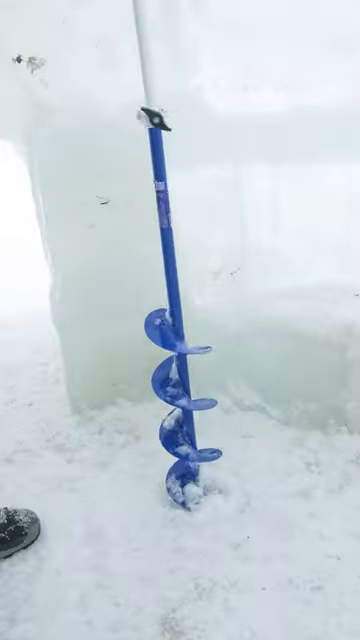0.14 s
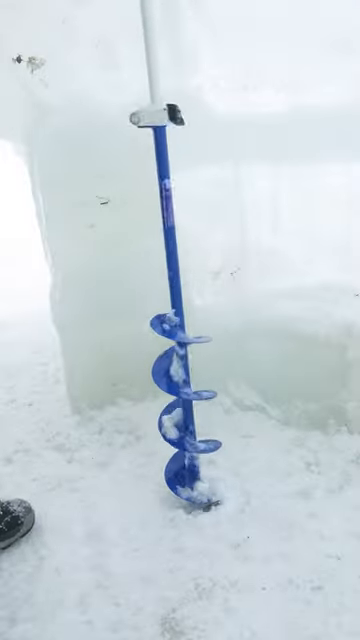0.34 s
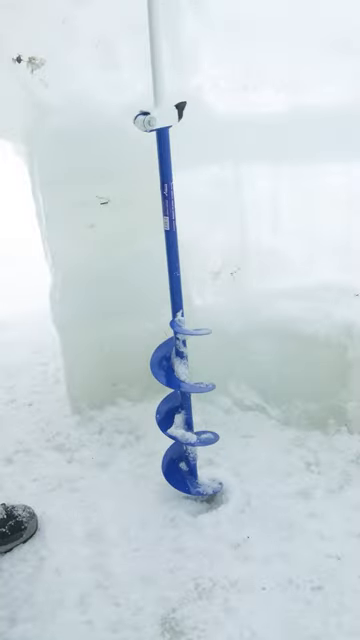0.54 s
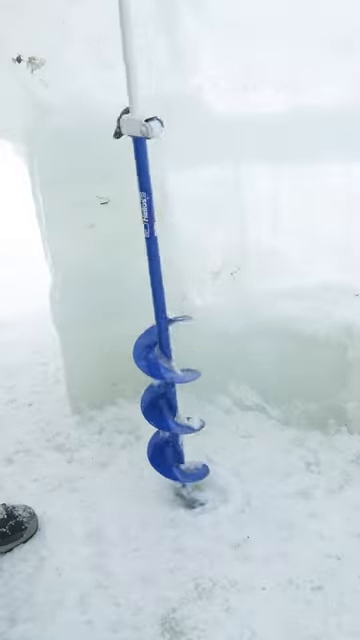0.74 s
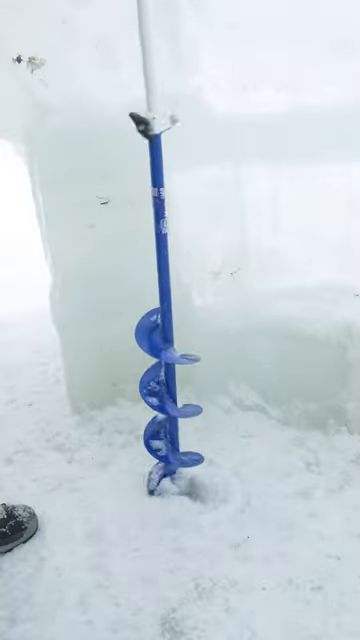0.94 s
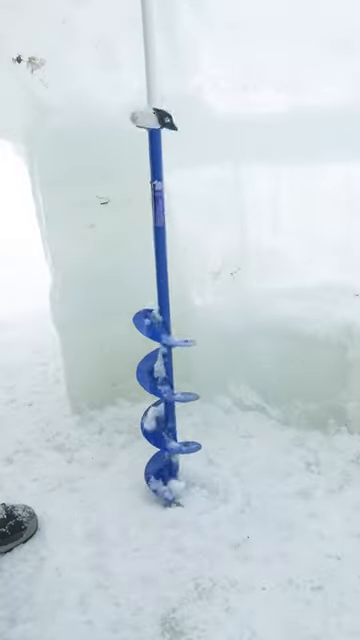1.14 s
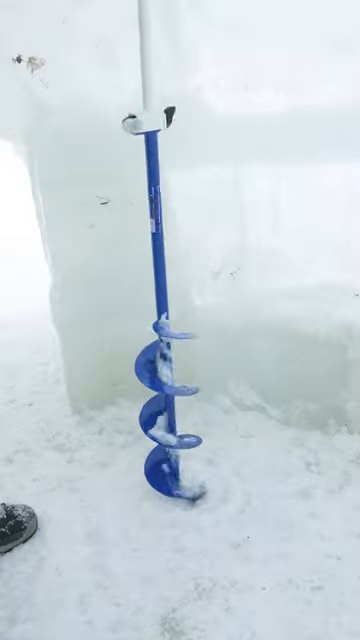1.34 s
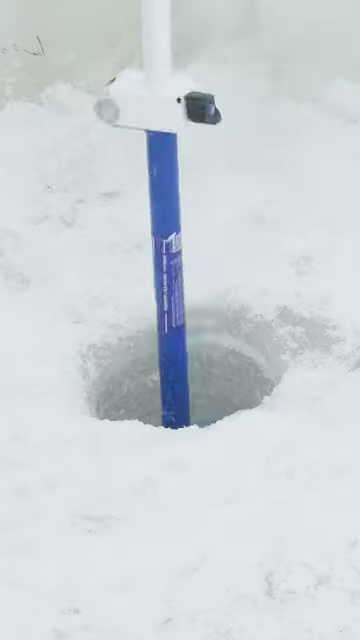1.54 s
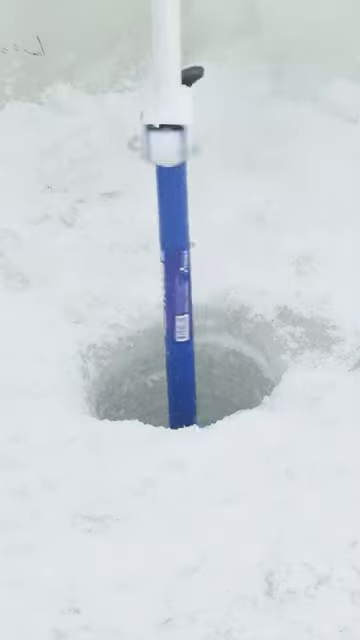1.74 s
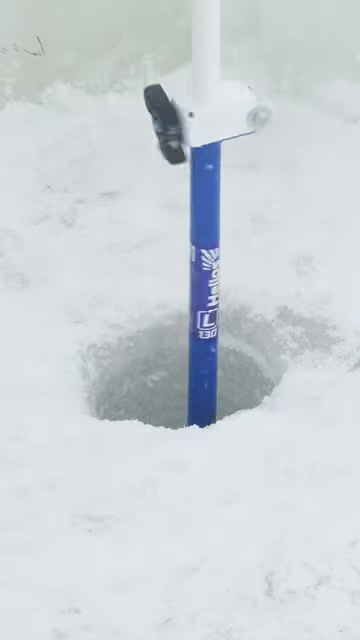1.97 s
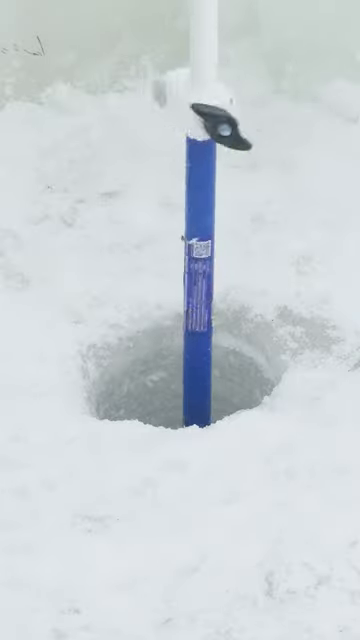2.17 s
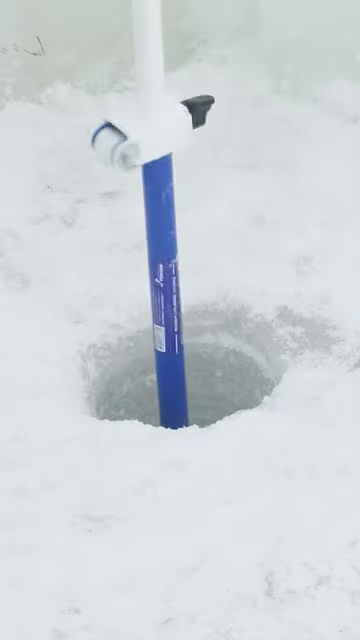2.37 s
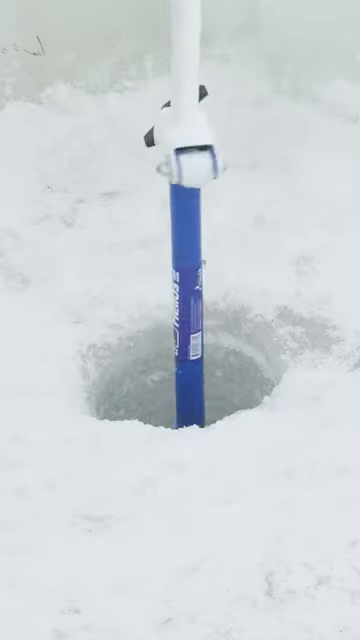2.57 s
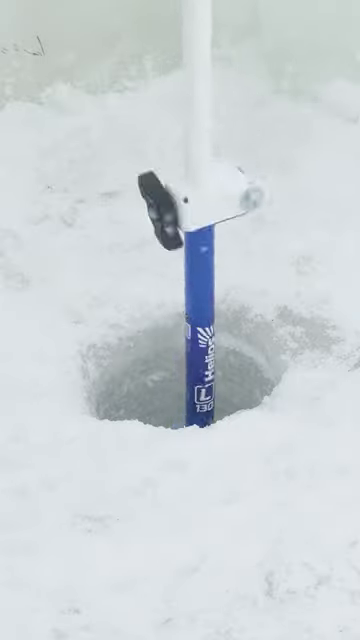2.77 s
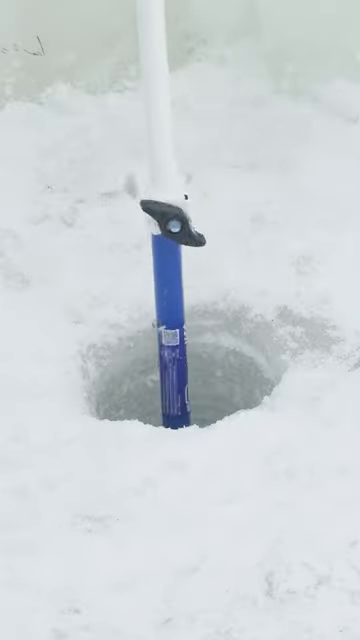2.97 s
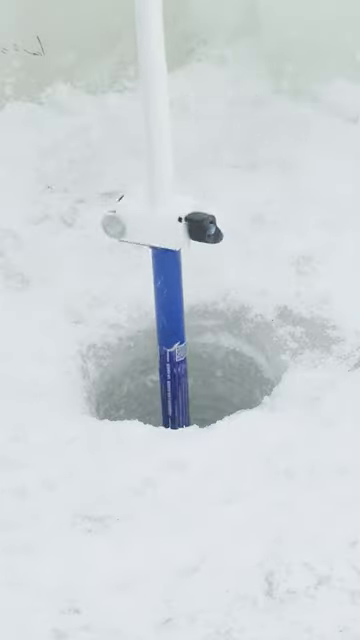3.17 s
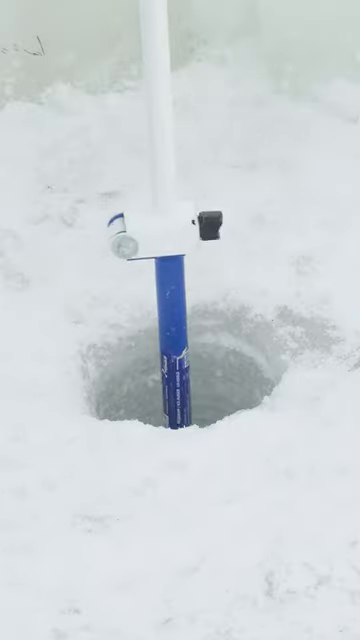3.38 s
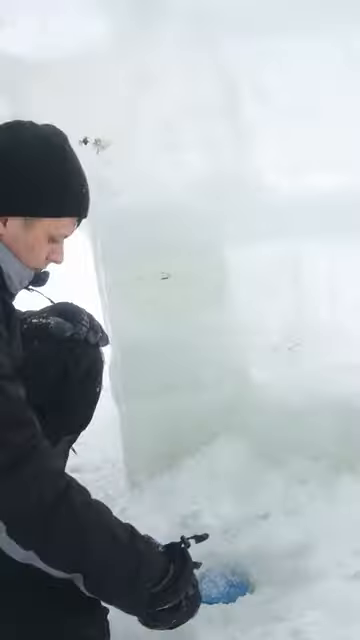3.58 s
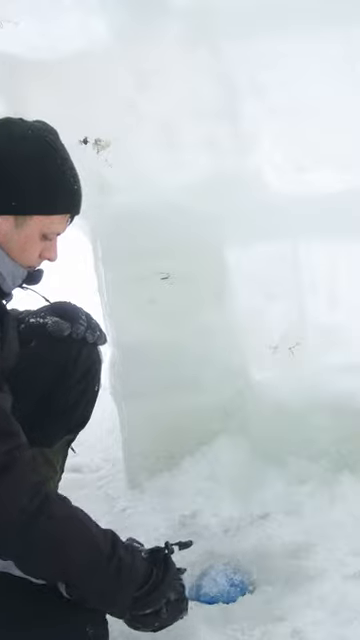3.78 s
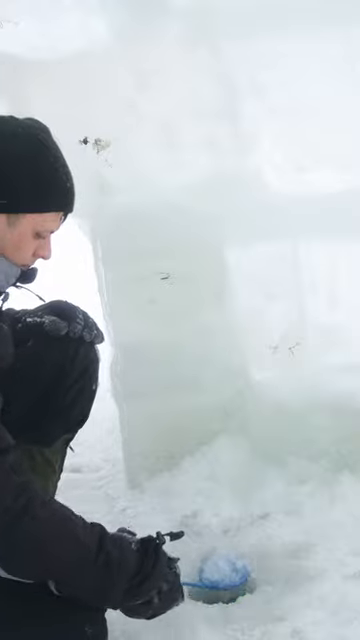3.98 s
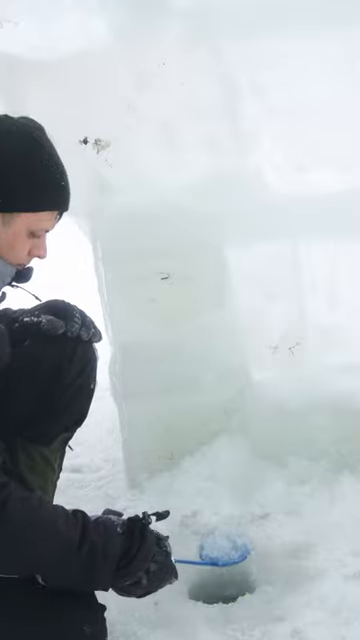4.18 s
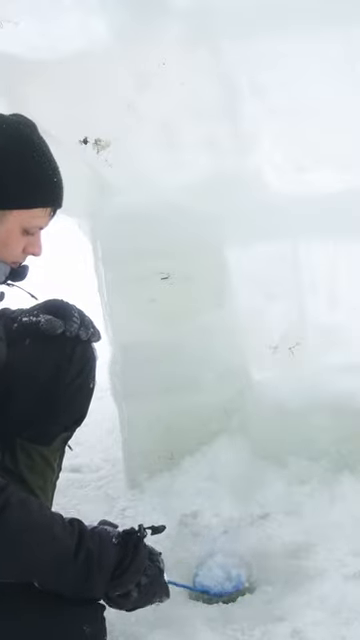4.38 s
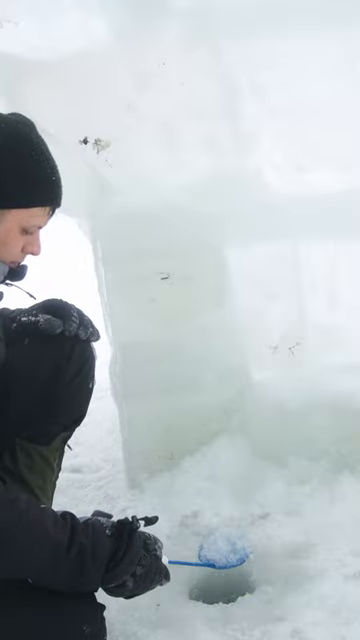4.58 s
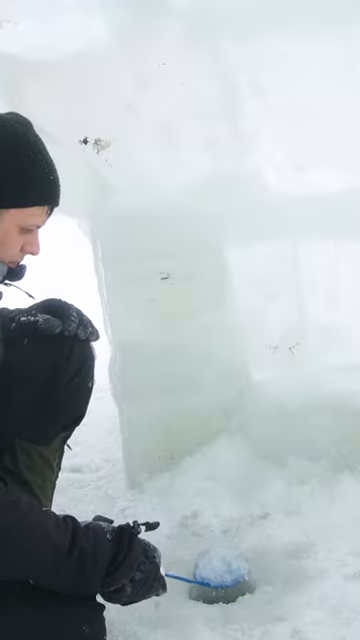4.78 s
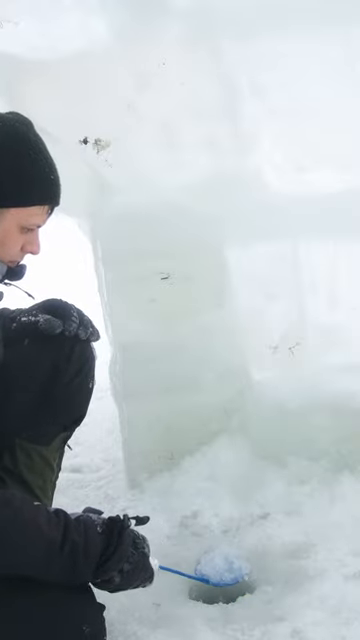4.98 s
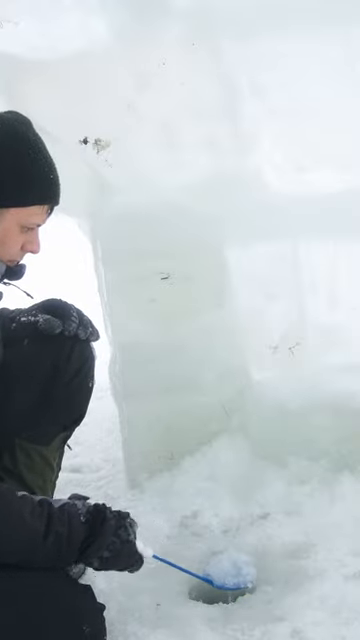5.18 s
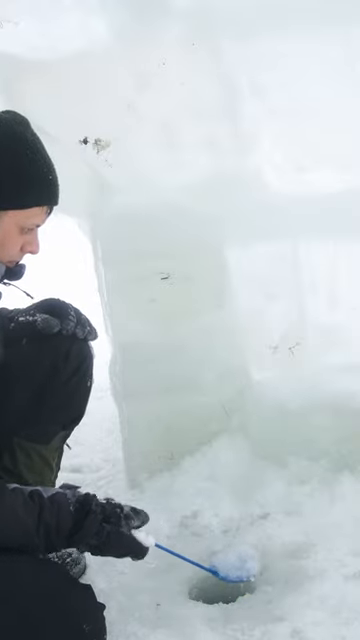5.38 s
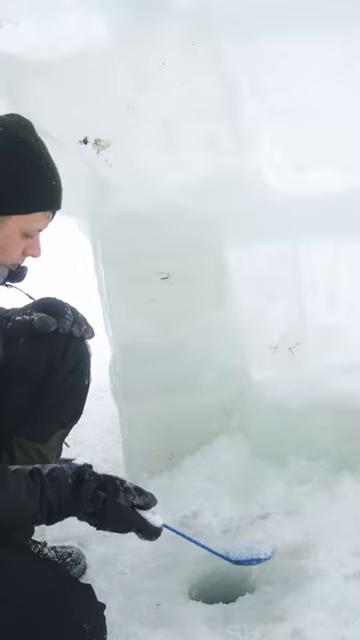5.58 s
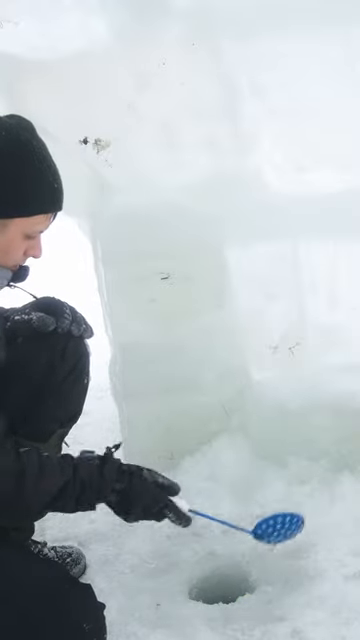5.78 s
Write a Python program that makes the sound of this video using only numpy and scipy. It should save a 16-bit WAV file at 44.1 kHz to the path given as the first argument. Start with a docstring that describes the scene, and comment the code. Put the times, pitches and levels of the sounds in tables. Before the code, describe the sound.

A hand auger grinds through ice with sharp cracks, breaks through into slush, then water drips from a ladle as a sleeve rustles.

```python
"""Inside an ice shelter on a lake, a hand auger shaves the ice: first at the surface, where its bare
steel flight rings, then close up and deep in the hole, where the ice sheet booms. The blades break
through and slush slides over rising water. Later a ladle lifts the slush: drops fall in the hole,
a sleeve rustles, water drains and grains scrape off the ladle."""
import sys
import numpy as np
from scipy import signal
from scipy.io import wavfile
from scipy.ndimage import uniform_filter1d

SR = 44100
rng = np.random.default_rng(int(sys.argv[2]) if len(sys.argv) > 2 else 0)


def master(y):
    """Save y as 16-bit WAV."""
    cut = np.clip(np.atleast_2d(y).T, -1, 1)
    pcm = np.round(cut * 32767)  # scale
    wavfile.write(sys.argv[1], SR, pcm.astype(np.int16))


N = 256662
T = np.arange(N) / SR
GIVE_S = 0.013  # the load on the blades is gone this soon after the ice gives
# The dull wash under water and sleeve. Each row: frequency in Hz, relative level in dB.
WASH_COLOUR = [(50, -25), (141, 0.5), (243, -0.5), (1500, -12), (1950, -54)]


def gain_of(db):
    """Decibels to amplitude."""
    return 10 ** (np.asarray(db) / 20)


def unit_rms(x):
    """Scales a signal to rms 1."""
    return x / np.sqrt(np.mean(x ** 2) + 1e-20)


def add(mix, start_s, sound):
    """Lays a sound into the mix."""
    part = mix[round(start_s * SR):][:len(sound)]
    part += sound[:len(part)]


def stretch(start_s, end_s):
    """The times of a stretch and its 3 ms edge fades."""
    t = T[round(start_s * SR):round(end_s * SR)]
    return t, np.clip(np.minimum(t - t[0], t[-1] - t) / .003, 0, 1)


def follow(t, rows):
    """The columns of a breakpoint curve at the times t."""
    times, *columns = np.transpose(rows)
    return [np.interp(t, times, column) for column in columns]


def drift(count, span_s):
    """A smooth random wander of rms 1 that changes over span_s."""
    size = int(span_s * SR)
    return unit_rms(uniform_filter1d(uniform_filter1d(rng.standard_normal(count), size), size))


def coloured(x, colour, lo_hz=0):
    """Minimum-phase EQ; for white input the band above lo_hz gets rms 1."""
    hz = abs(np.fft.fftfreq(4096, 1 / SR))
    points_hz, points_db = np.transpose(colour)
    db = np.interp(np.log(hz + 1), np.log(points_hz), points_db)
    log_gain = np.log(gain_of(np.maximum(db, -100)))
    taps = np.fft.ifft(np.exp(np.conj(signal.hilbert(log_gain)))).real[:2048]
    share = np.sum(np.exp(2 * log_gain[hz >= lo_hz])) / np.sum(np.exp(2 * log_gain))
    return unit_rms(signal.oaconvolve(x, taps)[:len(x)]) / np.sqrt(share)


def patchy(x, depth_db, tilt_db=0):
    """The contact keeps shifting: patches of the spectrum swell and sink; tilt is in dB per octave."""
    hz, t, spectrum = signal.stft(x, SR, nperseg=256)
    patches = rng.standard_normal(spectrum.shape[::-1]).T
    patches = unit_rms(uniform_filter1d(uniform_filter1d(patches, size=3, axis=0), size=30, axis=1))
    patches *= np.clip(hz[:, None] / 1500, .2, 1)  # the bass comes from the whole sheet and is steadier
    slope = np.interp(t * SR, np.arange(len(x)), tilt_db * np.ones(len(x)))
    octaves = np.log2(np.maximum(hz[:, None], 900) / 6000)
    spectrum *= gain_of(depth_db * patches + octaves * slope)
    return signal.istft(spectrum, SR, nperseg=256)[1][:len(x)]


def resonate(x, hz, width_hz):
    """A resonance that can glide: shifts hz down to zero, smooths, shifts back."""
    carrier = np.exp(2j * np.pi * np.cumsum(hz * np.ones(len(x))) / SR)
    pole = np.exp(-np.pi * width_hz / SR)
    return 2 * (carrier * signal.lfilter([1 - pole], [1, -pole], x / carrier)).real


def ring(x, modes, waver_db, bend=0.017):
    """Drives modes that waver in level and bend in pitch as the contact shifts; the sum has rms 1."""
    out = 0
    for hz, width_hz, db in modes:
        bent_hz = hz * (1 + bend * drift(len(x), 0.021))
        mode = resonate(resonate(x, bent_hz, 1.87 * width_hz), bent_hz, 0.94 * width_hz)
        out = out + gain_of(db + waver_db * drift(len(x), 0.056)) * mode
    return unit_rms(out)


def grit(count, per_s, spread_db, hiss, judder_db):
    """Small uneven clicks over fine hiss, as of chipping ice; the contact judders, so they clump."""
    clicks = gain_of(spread_db * np.minimum(rng.exponential(1, count), 4.5))
    clicks *= rng.choice([-1., 1.], count)
    clicks *= rng.random(count) < per_s / SR
    grains = unit_rms(clicks) + hiss * rng.standard_normal(count)
    return unit_rms(grains * gain_of(judder_db * drift(count, 0.0049)))


def air():
    """A faint, steady bed of room tone."""
    # Each row: frequency in Hz, relative level in dB.
    colour = [(40, -18), (401, -11), (1060, -24), (4590, -16), (8830, -27), (15700, -34.5)]
    return gain_of(-63) * coloured(rng.standard_normal(N), colour)


def shelter(x, t60_s):
    """Hard ice walls return sparse reflections of random sign, dying away."""
    taps = np.zeros(SR // 4)
    slots = np.arange(200, len(taps) - 20, 20)
    taps[slots + rng.integers(0, 20, len(slots))] = rng.choice([-1., 1.], len(slots))
    taps *= gain_of(-60 * T[:len(taps)] / t60_s)
    return signal.oaconvolve(x, taps / np.linalg.norm(taps))[:N]


def gurgle():
    """Water draining through the ladle hums in the mouth of the hole."""
    # Each row: time in seconds, level in dB.
    swell = [(5.13, -60), (5.23, -48), (5.37, -55)]
    t, edge = stretch(swell[0][0], swell[-1][0])
    hum_hz, width_hz = 837, 70
    hum = ring(rng.standard_normal(len(t)), [(hum_hz, width_hz, 0)], waver_db=1.0)
    return t[0], edge * gain_of(follow(t, swell)[0]) * hum


def ladle_scrape():
    """Slush grains slide off the ladle and strike its modes."""
    # Each row: pitch in Hz, nominal width in Hz, relative level in dB.
    ladle_modes = [(2780, 410, 1), (4870, 200, -1)]
    # Each row: time in seconds, level in dB.
    swell = [(5.201, -71), (5.52, -41.5), (5.6, -45)]
    t, edge = stretch(swell[0][0], swell[-1][0])
    grains = grit(len(t), per_s=2000, spread_db=0, hiss=0.54, judder_db=1.5)
    ladle = ring(grains, ladle_modes, waver_db=3.5, bend=0.041)
    return t[0], edge * gain_of(follow(t, swell)[0]) * ladle


def rustle():
    """A sleeve settles, then sweeps as the arm lifts; wet snow rubs. The loudest sets the brightness."""
    # The cloth's tone. Each row: frequency in Hz, relative level in dB.
    colour = [(40, -43), (75, -31), (276, -9), (492, -8.5), (1350, -7.5), (4610, -3), (10200, -11),
              (15700, -36)]
    # The arm's move. Each row: time in seconds, level in dB, brightness in dB per octave.
    sweep = [(3.58, -59, -1), (4.05, -64.5, -3), (4.13, -69.5, -1.5), (4.9, -61, -2), (5.03, -50.5, -0.5),
             (5.33, -42.5, 0.5), (5.82, -43, -1.5)]
    # Wet snow. Each row: start and fade time in seconds, level in dB, brightness in dB per octave.
    rubs = [(3.588, 0.16, -61.5, -7), (3.693, 0.11, -55.5, -1.5), (4.377, 0.21, -57.5, -2.5),
            (4.515, 0.083, -58, -1), (4.58, 0.045, -55, -1.5), (4.734, 0.057, -50.5, -2.5),
            (4.776, 0.11, -53, -0.5), (4.955, 0.019, -42.5, 4.5)]
    rise_s, fall_db = 0.0052, -14.5  # a rub falls this far over its fade time
    t, edge = stretch(3.58, 5.82)
    sleeve_db, tilt_db = follow(t, sweep)
    power = gain_of(sleeve_db) ** 2
    weighted_tilt = power * tilt_db
    for start_s, fade_s, db, rub_tilt_db in rubs:
        age = np.maximum(t - start_s, 0)
        rub = np.minimum(age / rise_s, 1) * gain_of(db + fall_db * (age / fade_s) ** 2)
        power += rub ** 2
        weighted_tilt += rub ** 2 * rub_tilt_db
    body = gain_of(1.814 * sleeve_db + 15) * coloured(rng.standard_normal(len(t)), WASH_COLOUR)
    friction = grit(len(t), per_s=5000, spread_db=2.7, hiss=1.4, judder_db=0.6)
    swish = patchy(coloured(friction, colour, lo_hz=4720), depth_db=2.3, tilt_db=weighted_tilt / power)
    return t[0], edge * (np.sqrt(power) * swish + body)


def snap(hz):
    """A dry crack of under two cycles, with a weaker after-swing."""
    t = np.arange(200) / SR - .0009
    crack = np.exp(-(t * hz / .6) ** 2)
    after_swing = .25 * np.clip(t * hz, 0, 1) * np.exp(-t / .0012)
    return (crack + after_swing) * np.cos(2 * np.pi * hz * t)


def drop(hz):
    """A short splash and a rising bubble note that wobbles among the slush; small bubbles die sooner."""
    t = np.arange(4000) / SR
    t60_s = 0.036 * (1000 / hz) ** 0.6
    phase = 2 * np.pi * hz * (t + 2.9 * t ** 2) + .8 * drift(len(t), .003)
    bubble = np.minimum(t * hz, 1) * gain_of(-60 * t / t60_s) * np.sin(phase)
    bubble *= 1 + 0.3 * drift(len(t), 0.0016)
    splash = gain_of(-4 - 60 * t / 0.0037) * rng.standard_normal(len(t))
    return bubble + signal.lfilter(*signal.butter(2, [1500, 9000], "band", fs=SR), splash)


def drips():
    """Wet slush ticks and drops fall from the ladle into the hole."""
    # Each row of both: start in seconds, level in dB, pitch of the tick or bubble in Hz.
    ticks = [(3.612, -35, 5500), (3.648, -34, 4500), (3.677, -36, 7000), (3.852, -33, 3500),
             (4.092, -43, 4500), (4.378, -32.5, 9500), (4.524, -33, 3200), (4.591, -32, 8000),
             (4.738, -32, 8000), (4.829, -32, 6000), (4.959, -26, 8900), (4.612, -24, 3700),
             (4.991, -25, 5800)]
    drops = [(3.724, -40.5, 1620), (3.734, -35, 3820), (3.853, -40.5, 1274), (4.284, -43, 2430),
             (4.3, -36.5, 1030), (4.341, -34.5, 930), (4.506, -46, 2110), (4.533, -35.5, 1270),
             (4.581, -37, 3230), (4.612, -27.5, 3670), (4.626, -28.5, 2740), (4.651, -35, 3100),
             (4.737, -28.5, 966), (4.778, -37.5, 1900), (4.940, -35, 5000), (4.959, -30.5, 4670),
             (5.009, -32, 3690), (5.052, -32, 2200), (5.590, -30, 1375), (5.706, -26.5, 4320)]
    track = np.zeros(N)
    for voice, hits in ((snap, ticks), (drop, drops)):
        for start_s, db, hz in hits:
            add(track, start_s, gain_of(db) * voice(hz))
    return track


def slush():
    """Shavings slide and crackle over a low wash of rising water."""
    # The crackle's tone. Each row: frequency in Hz, relative level in dB.
    colour = [(240, -27), (400, -1.5), (798, -4), (1800, 0.5), (2650, 0), (4130, 1), (8640, -13),
              (15700, -32.5)]
    # Each row: stop, rise time and hold time in seconds, lift over the steady crackle in dB.
    slides = [(2.828, 0.011, 0.023, 12.5), (3.307, 0.067, 0.11, 8), (3.543, 0.0087, 0.016, 2.5)]
    # Each row: time in seconds, level in dB.
    water_level = [(2.8, -55), (2.9, -40.5), (3.3, -42), (3.33, -54), (3.5, -47.5), (3.578, -41.5)]
    steady_db, settle_s = -41.5, 0.014
    t, edge = stretch(2.8, 3.578)
    fade_in = np.clip((t - t[0]) / 0.066, 0, 1)  # takes over as the blades stop biting
    slide_db = sum(np.interp(t, [stop - hold - rise, stop - hold, stop, stop + settle_s], [0, db, db, 0])
                   for stop, rise, hold, db in slides)
    grains = grit(len(t), per_s=3000, spread_db=3, hiss=0.97, judder_db=1.0)
    wash = coloured(rng.standard_normal(len(t)), WASH_COLOUR) * gain_of(follow(t, water_level)[0])
    crackle = patchy(coloured(grains, colour, lo_hz=3650), depth_db=1.5, tilt_db=0.15)
    return t[0], edge * fade_in * (gain_of(steady_db + slide_db) * crackle + wash)


def ice_snaps():
    """The ice cracks in single sharp snaps."""
    # Each row: start in seconds, peak level in dB, pitch in Hz.
    cracks = [(1.522, -8.5, 1510), (2.255, -9.5, 1580), (2.583, -7.5, 1730), (2.629, -7, 1740),
              (2.737, -6, 1830), (3.053, -8.5, 2200), (3.107, -16, 2285), (3.304, -4.5, 1760)]
    track = np.zeros(N)
    for start_s, db, hz in cracks:
        add(track, start_s, gain_of(db) * snap(hz))
    return track


def blade_load(t):
    """The blades load up until the ice gives: each bite swells steadily in dB, then drops."""
    # Each row: moment the ice gives and build-up time in seconds, lift over the steady cut in dB.
    bites = [(0.12, 0.1, 3), (0.54, 0.24, 3.5), (0.74, 0.24, 4), (0.94, 0.26, 5.5), (1.052, 0.016, 4.5),
             (1.206, 0.055, 6.5), (1.31, 0.22, 4), (1.525, 0.14, 3.5), (1.646, 0.077, 7.5),
             (1.79, 0.145, 5), (1.871, 0.17, 8), (2.044, 0.091, 8.5), (2.32, 0.029, 5.5), (2.47, 0.1, 3),
             (2.629, 0.16, 9.5), (2.785, 0.1, 3.5)]
    return np.max([np.interp(t, [gives - build, gives, gives + GIVE_S], [0, db, 0])
                   for gives, build, db in bites], axis=0)


def auger_at_surface():
    """Blades bite the top ice; shavings scrape up the free steel flight, which rings and briefly jams."""
    # The cut's tone. Each row: frequency in Hz, relative level in dB.
    colour = [(50, -26.5), (217, -13.5), (568, -15.5), (740, -14), (1010, -7), (1350, -8), (2600, -9),
              (5200, -8), (9950, -22), (15700, -47)]
    # The steel's modes. Each row: pitch in Hz, nominal width in Hz, relative level in dB.
    blade_modes = [(3690, 480, 14), (4190, 77, 16.5), (7100, 140, -0.5)]
    high_modes = [(1657, 72, 0), (2115, 170, 1.5), (2327, 55, 4)]
    low_modes = [(691.4, 29, -0.92), (750.7, 29, -0.075)]
    bright_mode = [(1511, 23, 0)]
    # How freely the steel rings as the screw turns. Each row: time in seconds, then the levels
    # of the loose, low, bright and high modes in dB against the steady cut.
    ring_levels = [(0.0, -5, -6, -2, -0.5), (.17, -6, -4.5, -21, -2), (.32, -8, -8.5, -17, -11),
                   (.5, -2.5, -1.5, 4.5, -2.5), (.61, -3, -7.5, -16, -1.5), (.68, 0.5, -2, -3, 7),
                   (0.788, -0.5, -23, -3.5, -3.5), (0.92, -1, -10.5, -1, -3), (.965, -13, -13, -14, -2.5),
                   (1.2, -2, -1, -3.5, 3.5), (1.27, 7.5, -8.5, -7.5, -0.5), (1.4, -3.5, -5.5, -10, -3.5),
                   (1.5, 2.5, -7, -17, -0.5)]
    steady_db, ring_share = -29.5, 0.12  # the free steel takes only this share of each bite's swell
    jam_s, tightest_s, screech_s, free_s = 0.736, 0.85, 0.94, 0.96
    loose_hz, jam_rise_hz, loose_width_hz = 1132, 141, 50
    t, edge = stretch(0, 1.578)
    bite_db = blade_load(t)
    loose_db, low_db, bright_db, high_db = follow(t, ring_levels)
    # Jammed in the shavings, the flight's loosest mode tightens and the blades screech.
    jam = np.interp(t, [jam_s, tightest_s, free_s], [0, 1, 0])
    screech_db = np.interp(t, [jam_s, screech_s, screech_s + GIVE_S], [0, 9, 0])
    chips = grit(len(t), per_s=6000, spread_db=3, hiss=1.0, judder_db=1.0)
    shavings = grit(len(t), per_s=5000, spread_db=2, hiss=0.97, judder_db=1.6)
    cut = patchy(coloured(chips, colour, lo_hz=2120), depth_db=2.5)
    cut += gain_of(screech_db - 10.5) * ring(chips, blade_modes, waver_db=2.2)
    loose_mode = [(loose_hz + jam_rise_hz * jam, loose_width_hz, 0)]
    steel = gain_of(loose_db) * ring(shavings, loose_mode, waver_db=-0.9)
    steel += gain_of(high_db) * ring(shavings, high_modes, waver_db=3.5, bend=0.014)
    steel += gain_of(low_db) * ring(shavings, low_modes, waver_db=0.6, bend=0.004)
    steel += gain_of(bright_db) * ring(shavings, bright_mode, waver_db=0.6, bend=0.004)
    auger = gain_of(bite_db) * cut + gain_of(ring_share * bite_db) * steel
    return t[0], edge * gain_of(steady_db) * auger


def auger_in_hole():
    """Down the hole, shavings damp the steel and the ice sheet booms until the blades break through."""
    # The cut's tone. Each row: frequency in Hz, relative level in dB.
    colour = [(59, -15.5), (100, -7.5), (404, 0), (630, -3), (923, 0), (1670, -2.5), (3810, -5.5),
              (9660, -24.5), (15700, -47)]
    # Buried steel and ice sheet. Each row: pitch in Hz, nominal width in Hz, relative level in dB.
    steel_modes = [(1015, 25, 7), (1458, 93, 7), (1660, 170, 3), (1898, 62, 4), (3545, 110, 0),
                   (9630, 240, -16)]
    ice_modes = [(90.6, 6.2, -2.5), (144, 16, -4.5), (200.4, 11, 1.5), (278, 81, -8.5), (472.6, 33, -6),
                 (548, 53, -10), (639, 41, -3.5)]
    # Each row: time in seconds, relative level in dB.
    boom_level = [(1.575, 12.5), (1.8, 13), (2.13, 4), (2.21, 13.5), (2.9, 12.5)]
    steel_share, ice_share = 0.68, 0.099  # how much of each bite's swell they pass on
    steady_db, through_s, through_db = -30.5, 2.795, -12.5
    t, edge = stretch(1.574, 2.9)
    bite_db = blade_load(t)
    level_db = steady_db + through_db * np.clip((t - through_s) / 0.075, 0, 1)
    chips = grit(len(t), per_s=3000, spread_db=3, hiss=0.64, judder_db=1.37)
    cut = patchy(coloured(chips, colour, lo_hz=2530), depth_db=1.2, tilt_db=0.12 * bite_db)
    cut *= gain_of(bite_db - 0.5)
    steel = gain_of(steel_share * bite_db - 3) * ring(chips, steel_modes, waver_db=2.3)
    boom_db = ice_share * bite_db + follow(t, boom_level)[0] - 12.5
    boom = gain_of(boom_db) * ring(chips, ice_modes, waver_db=2.3)
    return t[0], edge * gain_of(level_db) * (cut + steel + boom)


def scene():
    """All layers in the centre; only the snaps and drips echo off the walls."""
    mix = air()
    for source in (auger_at_surface, auger_in_hole, slush, rustle, gurgle, ladle_scrape):
        add(mix, *source())
    snaps, dripping = ice_snaps(), drips()
    mix += snaps + gain_of(-25.5) * shelter(snaps, t60_s=0.057)
    mix += dripping + gain_of(-1) * shelter(dripping, t60_s=0.22)
    return np.array([mix, mix])


def record(dry):
    """The microphone drops the deep bass; a steep low-pass trims the very top."""
    thin = signal.sosfilt(signal.butter(3, 72, "high", fs=SR, output="sos"), dry)
    low_pass = signal.firwin(511, 15850, window=("kaiser", 9), fs=SR)
    return signal.oaconvolve(thin, low_pass[None], "same")


dry = scene()
out = record(dry)
master(out)
```